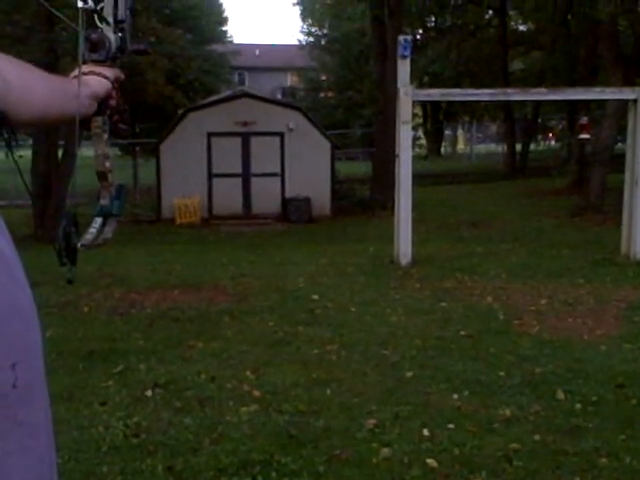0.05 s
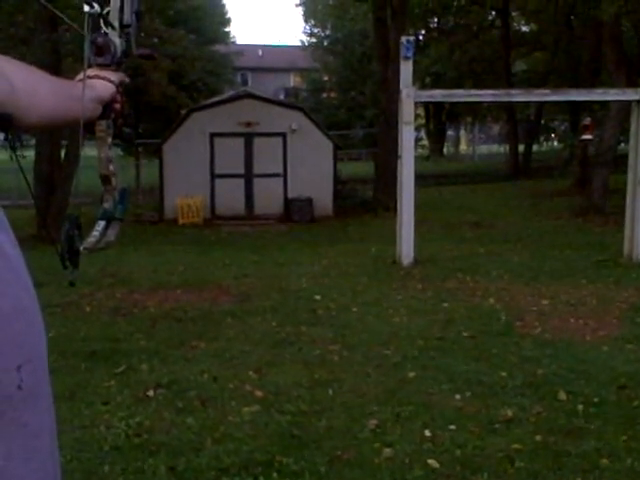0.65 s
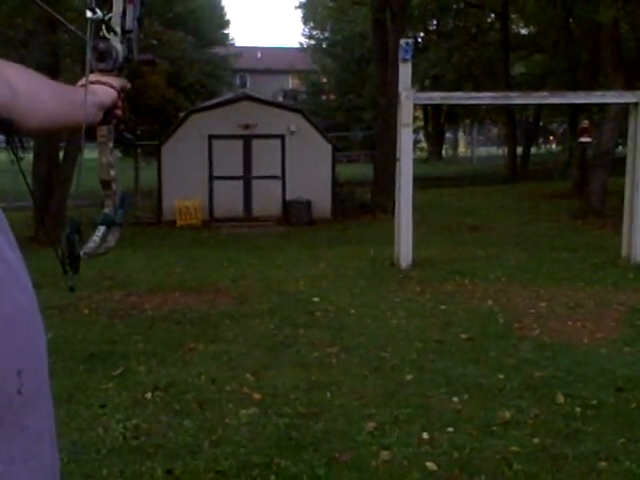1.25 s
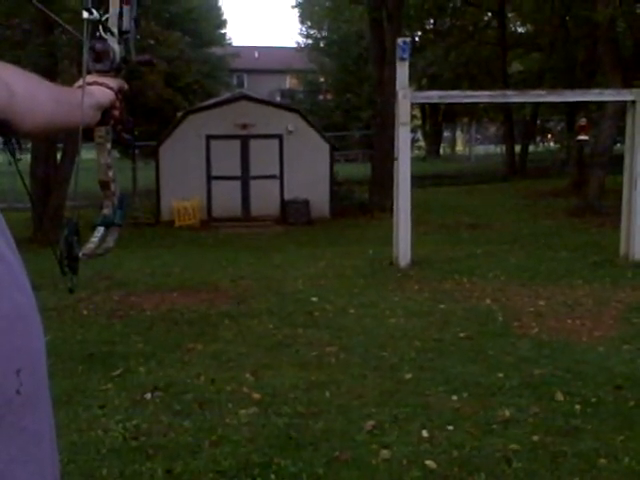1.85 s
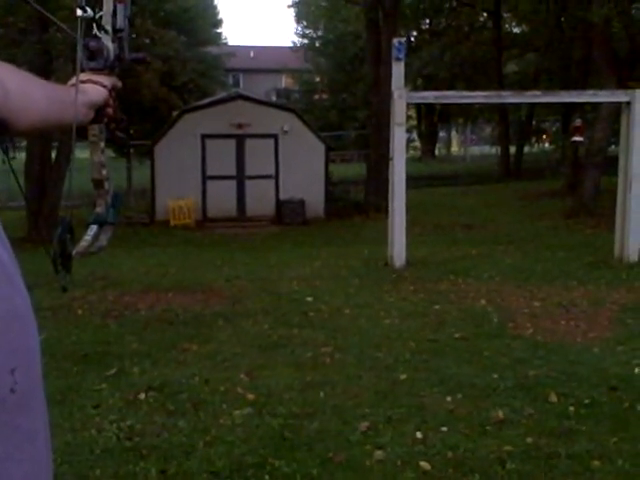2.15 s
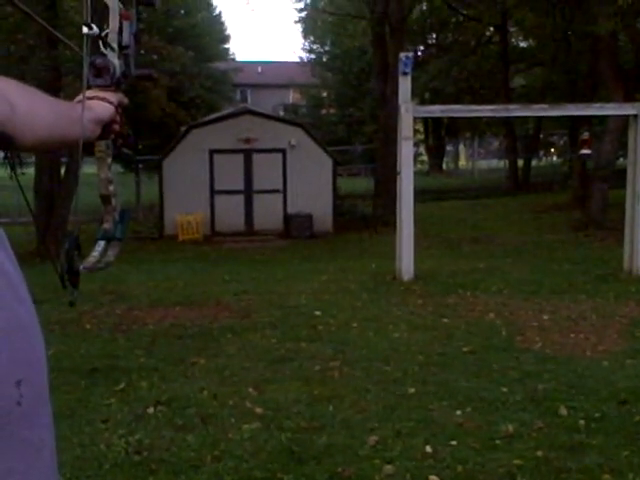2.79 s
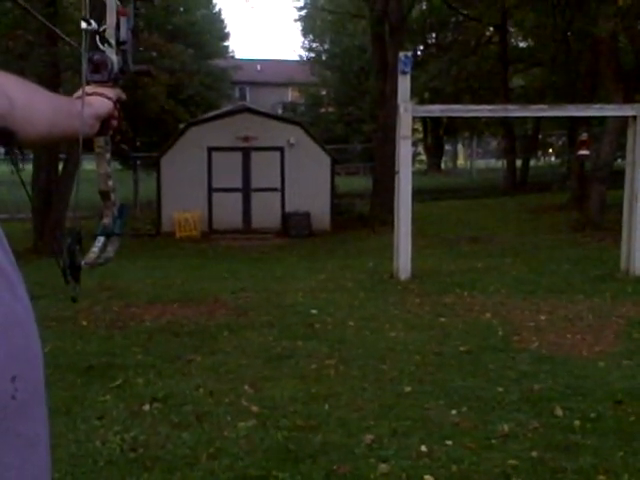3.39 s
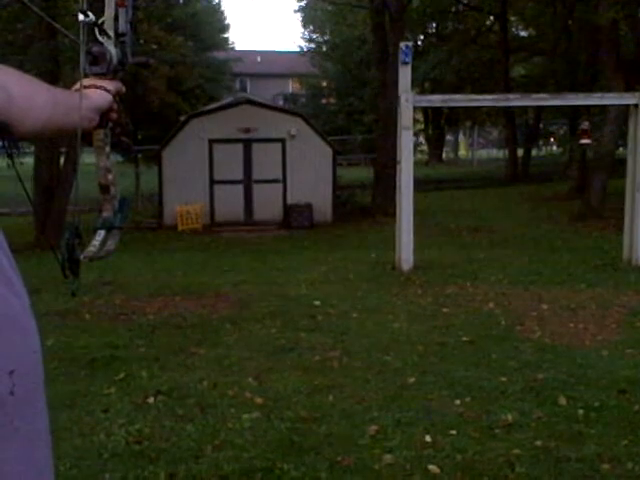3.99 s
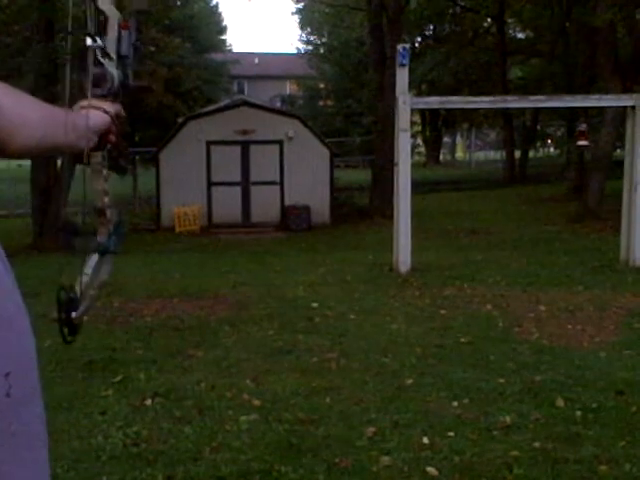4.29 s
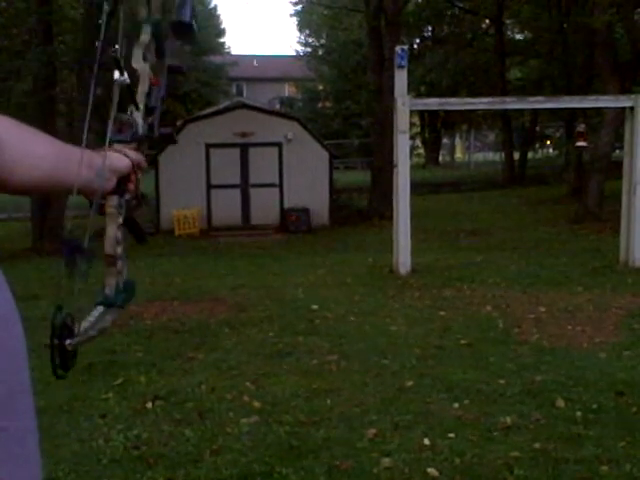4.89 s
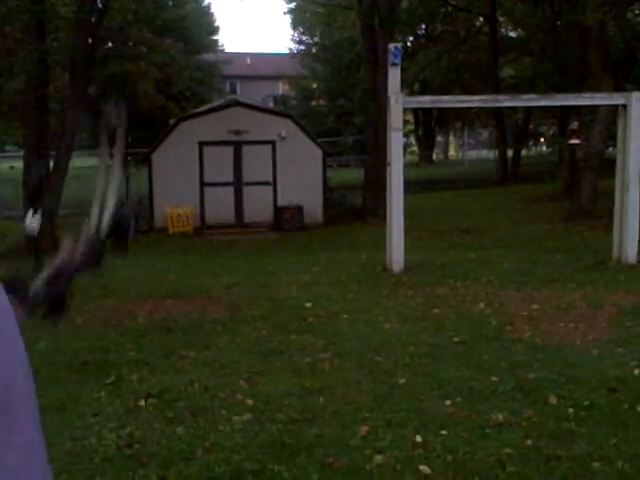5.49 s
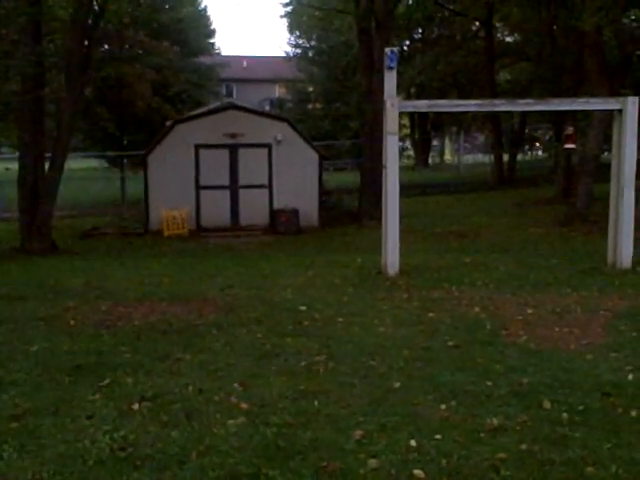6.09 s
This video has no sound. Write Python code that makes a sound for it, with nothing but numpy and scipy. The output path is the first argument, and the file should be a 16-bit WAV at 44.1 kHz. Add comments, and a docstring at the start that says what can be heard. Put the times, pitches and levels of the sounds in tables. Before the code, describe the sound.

Over steady crickets and a few bird chips, a close bow shot cracks, followed quickly by the arrow's thudding hit.

```python
"""A backyard at dusk, on one dull little microphone. Close by, a compound bow is shot: the release clicks,
string and limbs snap and buzz, and the arrow smacks into a target that thuds; both blows overload the
input. Trees and sheds scatter the shot back. Near crickets trill with their wings over a far chorus,
a bird chips and a sleeve rustles among faint ticks. Distant traffic and a machine hum underneath."""
import sys
import numpy as np
from scipy import signal
from scipy.fft import rfft, irfft, next_fast_len
from scipy.io import wavfile
from scipy.ndimage import uniform_filter1d, map_coordinates

SR = 44100
rng = np.random.default_rng(int(sys.argv[2]) if len(sys.argv) > 2 else 0)


def to_wav(s):
    """Save 16-bit WAV."""
    ch = np.atleast_2d(s).T  # columns
    pcm = np.round(np.clip(ch, -1, 1) * 32767)  # PCM
    wavfile.write(sys.argv[1], SR, pcm.astype(np.int16))


N = 275607

# Table levels are relative; a spectrum gives its level per Hz.
# spectrum of the distant road's rumble and hiss: f/Hz, level/dB
ROAD_SPECTRUM = [(10, -13.5), (28, 3.5), (110, 1), (170, -1), (230, -10), (290, -10), (420, -16.5),
                 (750, -15), (1300, -20.5), (3200, -22.5), (5200, -17.5), (6200, -21.5), (7400, -16),
                 (8400, -31.5)]
# tones of a far machine: f/Hz, level/dB
MACHINE_TONES = [(116, -55), (145.5, -54), (187, -60), (212, -61), (470, -74), (643, -75.5)]
# a far whine coming and going: t/s, level/dB
WHINE_LEVELS = [(0, -58), (1.5, -69), (3.3, -69.5), (3.55, -57), (4.65, -66.5), (4.95, -58), (5.5, -61.5),
                (5.7, -76)]
# tyres singing on the far road: t/s, f/Hz, level/dB
TYRE_SONG = [(0, 305, -64), (.25, 313, -53), (.65, 310, -63), (1.65, 308, -53), (2.0, 311, -53.5),
             (2.1, 344, -54), (2.32, 307, -57), (2.48, 340, -50.5), (2.85, 357.7, -54), (3.2, 340, -69),
             (5.8, 320, -78), (6.25, 345, -49)]
# near cricket calls by pitch and level: f/Hz, slide in a stroke/share of f, level/dB, call starts t/s
NEAR_CRICKETS = [(4710, .02, -48, [.22, 2.18, 4.95]), (4620, 0.017, -47, [.9, 2.35, 3.51, 5.39]),
                 (4426, .02, -41, [.35, 2.42]), (4420, .025, -47.5, [1.38, 3.8, 5.24, 6.08]),
                 (4290, 0.0079, -45, [0.541, 1.02, 2.74, 3.22, 4.83, 5.06])]
# swell of the far crickets: t/s, level/dB
CHORUS_LEVELS = [(0.0, -44), (0.61, -44), (0.92, -46), (1.3, -45), (2.26, -46.5), (2.64, -43.5),
                 (3.9, -46.5), (4.11, -43.5), (4.61, -49), (5.12, -42.5), (5.38, -47), (6.25, -43.5)]
# spectrum of the farthest crickets: f/Hz, level/dB
CHORUS_SPECTRUM = [(3200, -50), (3550, -20.5), (3800, -8.5), (4050, -3.5), (4250, 1), (4450, -2.5),
                   (4700, -14), (5200, -17), (6000, -43.5)]
# small dry ticks: t/s, level/dB
TICK_EVENTS = [(.194, -39), (0.321, -35), (0.527, -35), (.598, -36), (1.849, -37), (2.424, -32),
               (2.486, -36), (2.612, -35), (4.267, -25), (4.473, -29)]
# spectrum of ticks and crinkles: f/Hz, level/dB
TICK_SPECTRUM = [(200, -9), (1000, -0.5), (2000, -1), (5000, 3), (8000, -6.5)]
# the sleeve brushes as the arm shifts: middle t/s, half length/s, level/dB
SLEEVE_BRUSHES = [(.5, .2, -59.5), (2.482, 0.095, -52.5), (3.65, 0.071, -56), (5.66, .08, -57.5),
                  (6.097, 0.11, -54)]
# spectrum of rubbing cloth: f/Hz, level/dB
CLOTH_SPECTRUM = [(300, -13), (900, -3), (2500, -5), (5000, -5), (6800, 5.5), (8500, -14.5)]
# the bird's chips: t/s, level/dB
BIRD_CHIPS = [(1.109, -27.5), (3.204, -28.5), (4.848, -38.5), (5.63, -44)]
# spectrum of the microphone's distortion on each chip: f/Hz, level/dB
CHIP_DISTORTION_SPECTRUM = [(300, -18), (1000, -16.5), (3000, -18), (5600, -20), (6400, 1.5), (7350, -3.5),
                            (8000, -16), (8700, -17)]
# spectrum of a hollow knock: f/Hz, level/dB
KNOCK_SPECTRUM = [(500, -25), (1000, 0), (1500, -16), (6000, -23), (9000, -30)]
# the release's jaw and sear click open: t/s, level/dB
RELEASE_CLICKS = [(4.0260, -17), (4.0300, -10), (4.0324, -23)]
# string and cams slam into their stops: t/s, level/dB, t60/s
STOP_SLAMS = [(4.056, -1, .01), (4.0589, -2, 0.037), (4.0662, -4, .035)]
# spectrum of the bow's snap, close up: f/Hz, level/dB
BOW_SPECTRUM = [(40, -24.5), (170, -8), (420, -23), (600, -11.5), (1200, -22), (1700, -18.5), (3500, -17.5),
                (5100, -9.5), (5800, -4), (6400, 4), (7400, -2), (8200, -19), (9500, -28.5)]
# spectrum of the string running off the cams: f/Hz, level/dB
ZIP_SPECTRUM = [(1000, -24), (2200, -13.5), (2900, 2), (3800, -27.5)]
# ringing cams, cables and riser: f/Hz, level/dB, t60/s
METAL_MODES = [(574, -19.5, 0.05), (1510, -13, .05), (2300, -13, .05), (2750, -13, .05), (5000, -5.5, .08),
               (5615, -4.5, .1), (5940, -3, .1), (6250, 0.5, 0.15), (6450, -1.5, .1), (6600, -0.5, .1),
               (6700, -0.5, .1), (7000, -1, .12), (7270, 0, 0.11), (7500, 0, .12), (8000, 1, .06)]
# spectrum of the knock in the handle: f/Hz, level/dB
HANDLE_SPECTRUM = [(100, -7), (500, -5.5), (1200, -11), (1650, 0.5), (2200, -2.5), (4000, -4.5),
                   (6000, -36)]
# the limbs' damped low swings: f/Hz, level/dB, swell/s
LIMB_SWINGS = [(160, -22.5, .003), (64.5, -21, .0065)]
# spectrum of the point piercing the target face: f/Hz, level/dB
SMACK_SPECTRUM = [(60, -23.5), (150, -9), (600, -11), (1300, -22), (2100, -18), (2800, -11), (3500, -18.5),
                  (4300, 1.5), (5200, 4.5), (6800, 1.5), (8400, -22), (9500, -39)]
# spectrum of the bag taking the blow: f/Hz, level/dB
BAG_SPECTRUM = [(40, 1.5), (150, -10.5), (350, 0.5), (550, -10), (850, -5), (1200, -27), (3000, -18)]
# the target's frame and filling: f/Hz, level/dB, t60/s
TARGET_RESONANCES = [(75, -12.5, 0.051), (225, -31.5, 0.12), (345, -18, 0.13), (471.4, -29, 0.18)]
# spectrum of the shivering shaft: f/Hz, level/dB
SHAFT_SPECTRUM = [(500, -10), (2500, -6), (4500, -0.5), (7100, 11), (8500, -14.5)]
# the target's thud and its echoes: t/s, level/dB, f/Hz
TARGET_THUDS = [(4.3499, -11.5, 205), (4.3802, -19, 195), (4.479, -32, 221)]
# decay of the yard's tail: f/Hz, t60/s
YARD_DECAY = [(150, 0.6), (600, 0.68), (2500, 0.58), (6500, 0.69), (9000, 0.79)]
# colour of the yard's tail: f/Hz, level/dB
YARD_RESPONSE = [(100, -10.5), (400, -4), (800, -3), (1500, -1), (4000, -3.5), (5700, -1.5), (6500, 0),
                 (7400, 0), (9000, -0.5)]

CALL_S, CALL_RISE_S, STROKE_HZ = 0.311, .06, 41.11  # a cricket's call: length, fade, wing-stroke rate
ZIP_S, STOP_S, HIT_S = 4.0535, 4.0595, 4.3416  # the string runs, the limbs stop, the arrow lands
SLIDE_DB, SLIDE_RISE_DB_PER_S = -20.5, 851  # the arrow hisses along its rest until the string stops
SWING_HZ, SLAP_DB, SLAP_LOSS_DB = 64, -6, 1.5  # the string slaps once a swing, weaker each time
RELEASE_T60_S, SLAP_T60_S = 0.0054, 0.011


def amp(db):
    """Decibels to gain."""
    return 10 ** (np.asarray(db) / 20)


def unit(x):
    """Scale to rms 1."""
    return x / np.sqrt(np.mean(x ** 2) + 1e-20)


def along(points, hz):
    """Read (f/Hz, value) points on a log axis."""
    f, v = np.transpose(points)
    return np.interp(np.log(hz + 1), np.log(f + 1), v)


def clock(size=N):
    """Seconds at each sample."""
    return np.arange(size) / SR


def curves(rows):
    """One value per sample for each column after the time."""
    s, *cols = np.transpose(rows)
    return [np.interp(clock(), s, c) for c in cols]


def wobble(rate):
    """A smooth random curve, rate knots a second."""
    return map_coordinates(rng.standard_normal(int(N * rate / SR) + 4), [clock() * rate])


def filtered(x, response):
    """Filter x by a gain that depends on frequency."""
    m = next_fast_len(N + SR // 2)
    return irfft(rfft(x, m) * response(np.fft.rfftfreq(m, 1 / SR)), m)[:N]


def noise(spectrum):
    """Coloured noise of rms 1."""
    return unit(filtered(rng.standard_normal(N), lambda hz: amp(along(spectrum, hz))))


def even_noise(spectrum, window_s=0.00079):
    """Coloured noise with its chance swells levelled out, leaving the fine grain."""
    x = noise(spectrum)
    return x / np.sqrt(np.abs(uniform_filter1d(x ** 2, round(window_s * SR))) + 1e-9)


def fade(t, t60):
    """Exponential decay, 60 dB down at t60."""
    return np.exp(-np.log(1000) * t / t60)


def add(track, s, sound):
    """Mix a sound into a track at s seconds."""
    part = track[max(round(s * SR), 0):][:len(sound)]
    part += sound[:len(part)]


def bursts(rows, attack_s=.00025):
    """Envelope of sudden, dying blows: t/s, level/dB, t60/s."""
    power, t = np.zeros(N), clock(SR // 2)
    for s, db, t60 in rows:
        add(power, s, (amp(db) * fade(t, t60) * (1 - np.exp(-t / attack_s))) ** 2)
    return np.sqrt(power)


def push(hz, swell_s):
    """A heavily damped low swing whose envelope peaks after swell_s."""
    t = clock(SR // 4)
    return -np.sin(2 * np.pi * hz * t) * (t / swell_s * np.exp(1 - t / swell_s)) ** 2


def ringing(modes, blur_rad, attack_s=0.0024):
    """Damped modes with wandering phases: f/Hz, level/dB, t60/s."""
    t = clock(SR // 2)
    knots = t[::SR // 250]
    out = np.zeros_like(t)
    for hz, db, t60 in modes:
        wander = blur_rad * np.interp(t, knots, rng.standard_normal(len(knots)))
        out += amp(db) * fade(t, t60) * np.sin(2 * np.pi * hz * t + wander)
    return (1 - np.exp(-t / attack_s)) * out


def traffic():
    """A road in the distance: rumble and hiss, with tyres singing at a wavering pitch."""
    rumble = amp(-48.0 + 0.25 * wobble(6.2)) * noise(ROAD_SPECTRUM)
    pitch, level_db = curves(TYRE_SONG)
    phase = 2 * np.pi * np.cumsum(pitch) / SR + 0.57 * wobble(45)
    tyres = unit(np.sin(phase) + 0.14 * np.sin(2 * phase))
    return rumble + amp(level_db - 2.5 + 2.56 * wobble(14)) * tyres


def machine(whine_hz=351):
    """Far off, a machine's hum wavers and a whine comes and goes."""
    out = np.zeros(N)
    for hz, db in MACHINE_TONES + [(whine_hz, curves(WHINE_LEVELS)[0] - 2)]:
        gain = amp(db + 2.04 * wobble(2.6))
        out += gain * unit(np.sin(2 * np.pi * hz * clock() + 1.28 * wobble(5.4)))
    return out


def trill(hz, slide, stumble=.06, scatter=.005):
    """One cricket call: each wing stroke is a short rising tone of its own strength and pitch."""
    t = clock(SR // 2)
    beat = t * STROKE_HZ * (1 + 0.018 * rng.standard_normal())
    drift, strength, detune = rng.standard_normal((3, SR // 100))
    uneven_beat = beat + stumble * np.interp(beat, np.arange(len(drift)), drift)
    stroke, progress = np.divmod(np.abs(uneven_beat), 1)
    stroke = stroke.astype(int)
    call = np.clip(np.minimum(t, CALL_S - t) / CALL_RISE_S, 0, 1)
    pitch = hz * (1 + slide * (progress - .35) + scatter * detune[stroke])
    wing = amp(1.6 * strength[stroke]) * np.sin(np.pi * np.minimum(progress / 0.76, 1))
    return np.sqrt(call) * unit(wing * np.sin(2 * np.pi * np.cumsum(pitch) / SR))


def far_crickets(count=90):
    """Distant calls overlap, and the farthest merge into a flickering band."""
    calls = np.zeros(N)
    for k, (when, pitch) in enumerate(rng.random((count, 2))):
        add(calls, (k + when) / count * N / SR, trill(3900 + 450 * pitch, slide=0.01506))
    band = amp(0.33 * wobble(70)) * noise(CHORUS_SPECTRUM)
    return amp(curves(CHORUS_LEVELS)[0]) * (amp(-5.0) * unit(calls) + amp(1.5) * band)


def sleeve_and_ticks(count=120, crinkle_db=4, spread_db=4):
    """A sleeve rustles and crinkles as it brushes, among faint dry ticks."""
    rub = amp(-66.5)
    for s, half, db in SLEEVE_BRUSHES:
        rub = rub + amp(db) * np.exp(-((clock() - s) / half) ** 2 / 2)
    crinkles = [(when * N / SR, crinkle_db - spread_db * np.log(softness + .02), .006)
                for when, softness in rng.random((count, 2))]
    ticks = bursts([(s, db, .008) for s, db in TICK_EVENTS])
    crackle = np.hypot(ticks, rub * bursts(crinkles)) * even_noise(TICK_SPECTRUM)
    rustle = amp(-1.5) * rub * amp(2.9 * wobble(60)) * noise(CLOTH_SPECTRUM)
    return crackle + rustle


def near_crickets():
    """A few crickets trill near the microphone; the one near 4420 Hz calls both louder and softer."""
    out = np.zeros(N)
    for hz, slide, db, starts in NEAR_CRICKETS:
        for s in starts:
            add(out, s, amp(db) * trill(hz, slide))
    return out


def bird():
    """A bird some way off chips in quick upward whistles, each with a fizz of microphone distortion."""
    whistles, t = np.zeros(N), clock(SR // 20)
    pitch = np.interp(t, [0, .006], [6100, 7400])
    swell = t / 0.0035
    whistle = swell * np.exp(1 - swell) * np.sin(2 * np.pi * np.cumsum(pitch) / SR)
    for s, db in BIRD_CHIPS:
        add(whistles, s, amp(db - 6.5) * whistle)
    fizz = bursts([(s, db, .03) for s, db in BIRD_CHIPS]) * even_noise(CHIP_DISTORTION_SPECTRUM)
    return whistles + amp(-1.0) * fizz


def knock(at_s=2.468, db=-38.5, t60=.05):
    """One soft, hollow knock."""
    return bursts([(at_s, db, t60)]) * even_noise(KNOCK_SPECTRUM)


def bow(ring_db=-22.5, zip_db=-17, handle_db=-17.5):
    """Close by, the release clicks; the string zips, slams and swings on; cams ring and limbs kick."""
    clicks = [(s, db, RELEASE_T60_S) for s, db in RELEASE_CLICKS]
    slaps = [(STOP_S + (k + 1) / SWING_HZ, SLAP_DB - SLAP_LOSS_DB * k, SLAP_T60_S) for k in range(6)]
    until_slam = STOP_SLAMS[0][0] - clock()
    slide = amp(SLIDE_DB - SLIDE_RISE_DB_PER_S * np.abs(until_slam)) * (until_slam > 0)
    out = np.hypot(bursts(clicks + STOP_SLAMS + slaps), slide) * even_noise(BOW_SPECTRUM)
    add(out, STOP_S, amp(ring_db) * ringing(METAL_MODES, blur_rad=0.78))
    out += bursts([(ZIP_S, zip_db, 0.037)]) * even_noise(ZIP_SPECTRUM)
    out += bursts([(STOP_S, handle_db, 0.03)]) * even_noise(HANDLE_SPECTRUM)
    for hz, db, swell_s in LIMB_SWINGS:
        add(out, STOP_S, amp(db) * push(hz, swell_s))
    return out


def arrow():
    """Down the yard, the point smacks the target's face; the bag takes the blow and the shaft shivers."""
    smack = bursts([(HIT_S, -0.46, 0.012), (HIT_S + 0.00086, -1.2, 0.0041)]) * even_noise(SMACK_SPECTRUM)
    shaft = bursts([(HIT_S + .003, -27, 0.14), (HIT_S + 0.016, -26.5, 0.2)]) * noise(SHAFT_SPECTRUM)
    thud = np.zeros(N)
    for s, db, hz in TARGET_THUDS:
        add(thud, s, amp(db) * push(hz, swell_s=0.0028))
    add(thud, HIT_S + 0.002, amp(-2.5) * ringing(TARGET_RESONANCES, blur_rad=0.067))
    bag = bursts([(HIT_S + .001, -27, 0.19)]) * even_noise(BAG_SPECTRUM, window_s=.015)
    return smack + shaft + thud + bag


def yard(x, frame, build_s=0.0072):
    """Trunks, leaves and walls scatter each band's energy into a diffuse tail that builds and dies."""
    hz, t, bands = signal.stft(x, SR, nperseg=frame)
    t = t[t < 1]
    decay = (fade(t, along(YARD_DECAY, hz)[:, None]) * (1 - np.exp(-t / build_s))) ** 2
    decay /= decay.sum(1, keepdims=True)
    energy = signal.fftconvolve(np.abs(bands) ** 2, decay, axes=1)[:, :bands.shape[1]]
    scatter = signal.stft(rng.standard_normal(N), SR, nperseg=frame)[2]
    tail = scatter / scatter.std() * np.sqrt(np.abs(energy)) * amp(along(YARD_RESPONSE, hz))[:, None]
    return signal.istft(tail, SR, nperseg=frame)[1][:N]


def scene():
    """The yard in mono from beside the bow; the bird comes with the largest share of scattered sound."""
    shot, hit, chips, trills = bow(), arrow(), bird(), near_crickets()
    chorus = far_crickets()
    direct = shot + hit + chips + sleeve_and_ticks() + knock()
    scattered = yard(amp(-5) * shot + amp(-11.5) * hit + amp(5.0) * chips, frame=256)
    calls = trills + amp(-2) * yard(trills, frame=1024)
    return (direct + scattered + amp(-1.0) * calls + chorus + traffic() + machine())[None]


def record(dry, edge_hz=8550, ceiling=0.69, spill_db=-6, top_hz=16300):
    """A dull little microphone whose input overloads on the two loudest blows."""
    dull = filtered(dry[0], lambda hz: 1 / np.sqrt(1 + (hz / edge_hz) ** 100))
    clipped = dull / (1 + np.abs(dull / ceiling) ** 12) ** (1 / 12)
    # the overload spills treble above the edge; a shelf softens it
    shelf = lambda hz: amp(spill_db * np.clip((hz - 9000) / 3000, 0, 1)) * (hz < top_hz)
    return filtered(clipped, shelf)[None]


dry = scene()
out = record(dry)
to_wav(out)
```